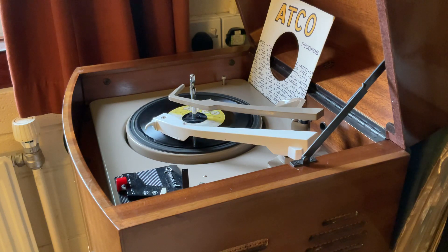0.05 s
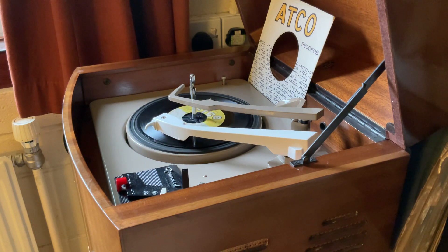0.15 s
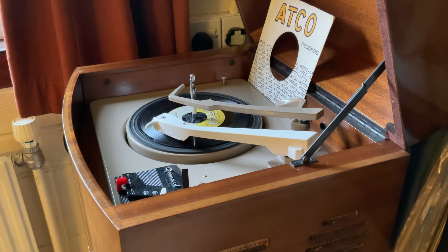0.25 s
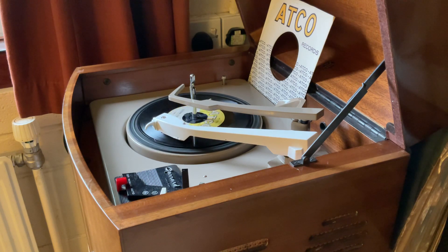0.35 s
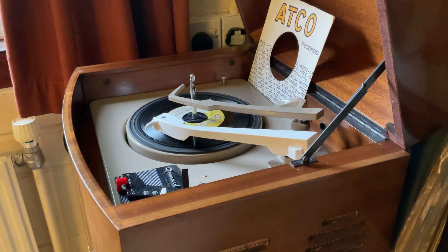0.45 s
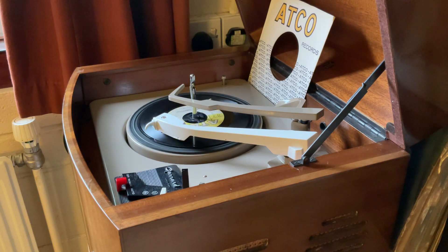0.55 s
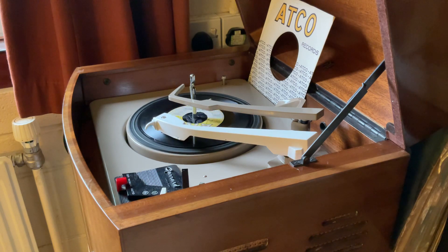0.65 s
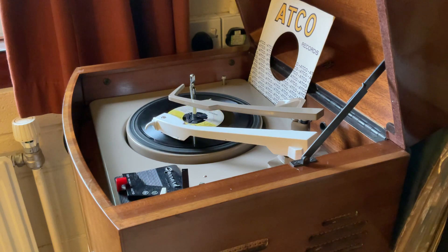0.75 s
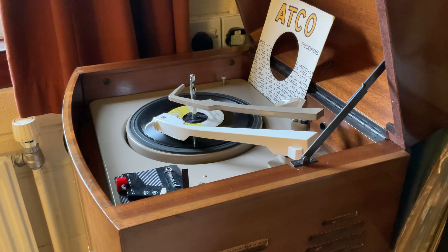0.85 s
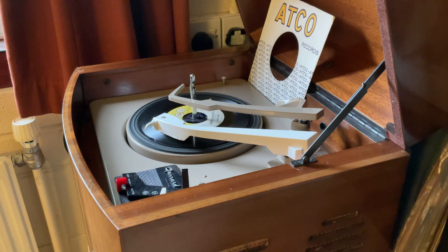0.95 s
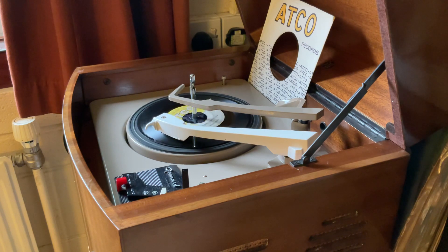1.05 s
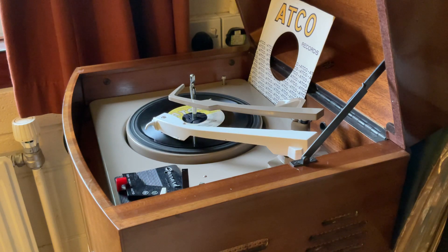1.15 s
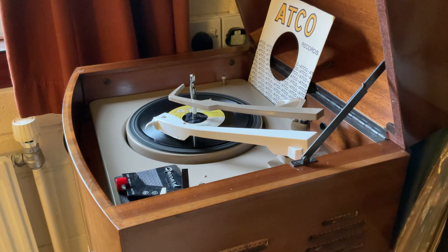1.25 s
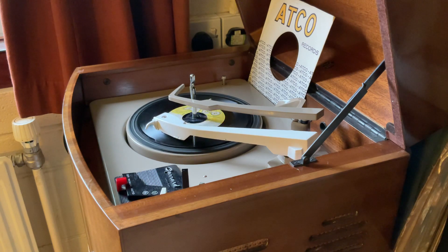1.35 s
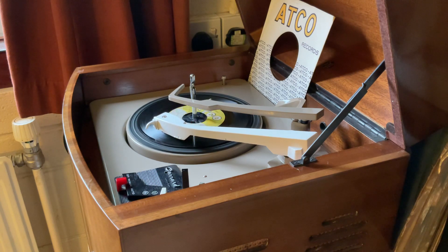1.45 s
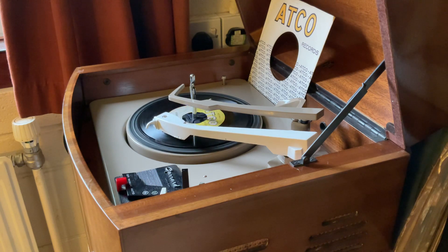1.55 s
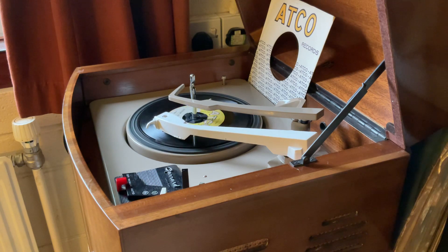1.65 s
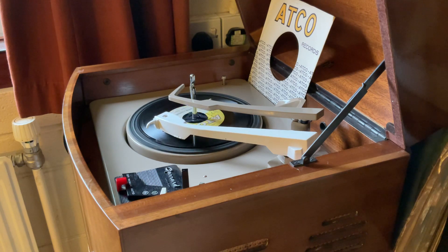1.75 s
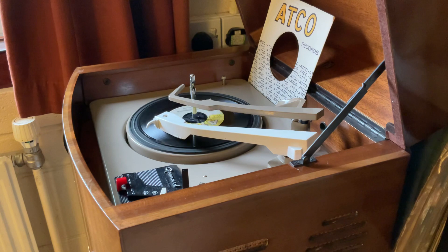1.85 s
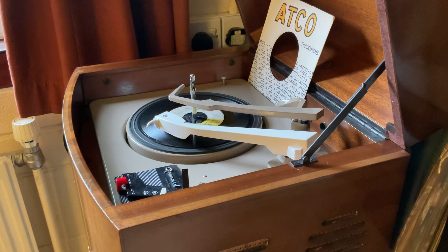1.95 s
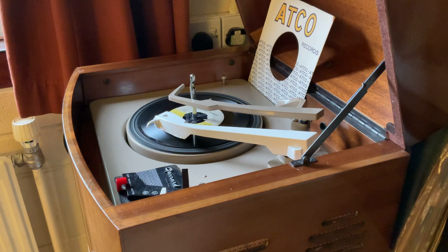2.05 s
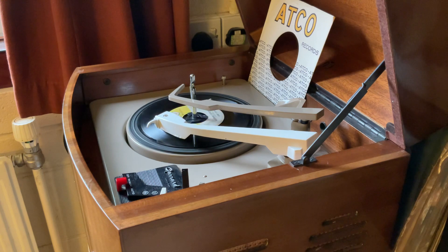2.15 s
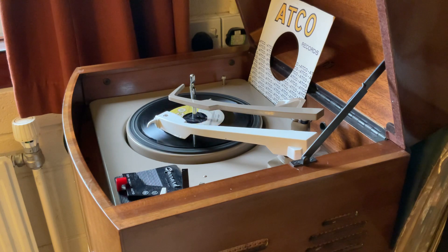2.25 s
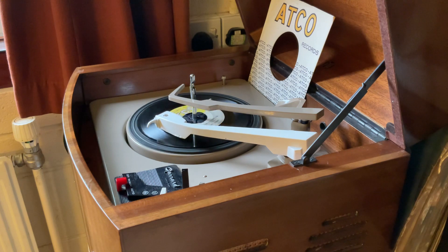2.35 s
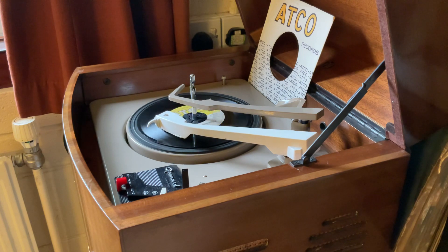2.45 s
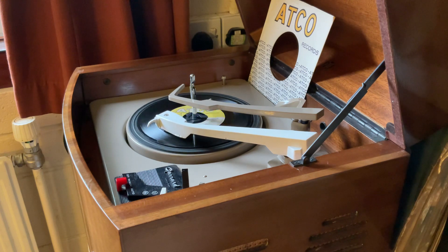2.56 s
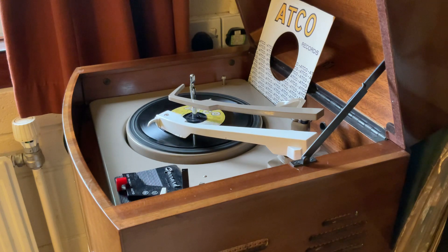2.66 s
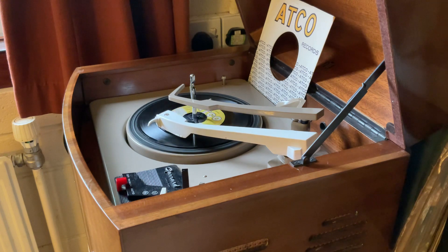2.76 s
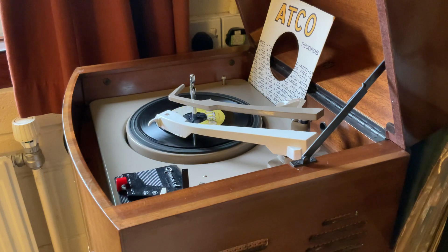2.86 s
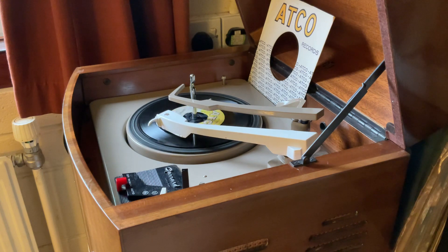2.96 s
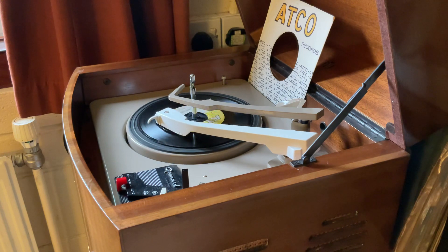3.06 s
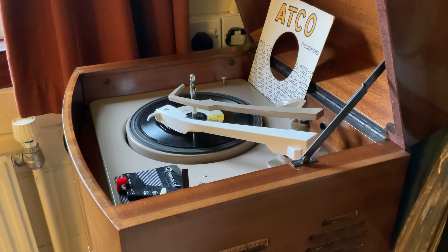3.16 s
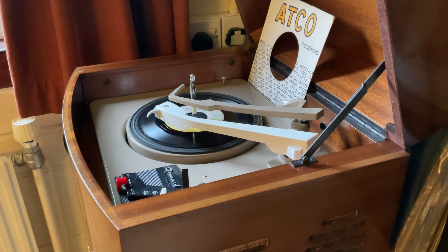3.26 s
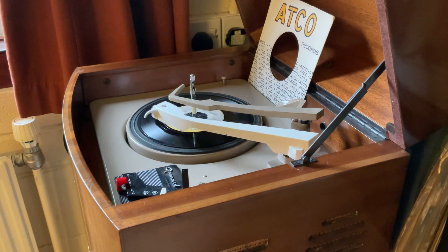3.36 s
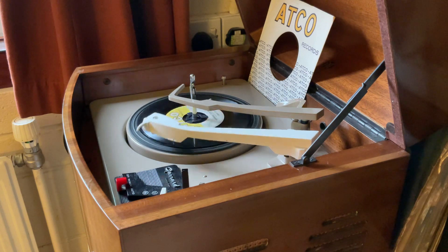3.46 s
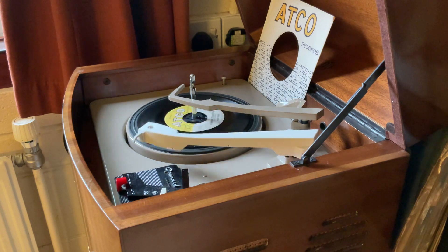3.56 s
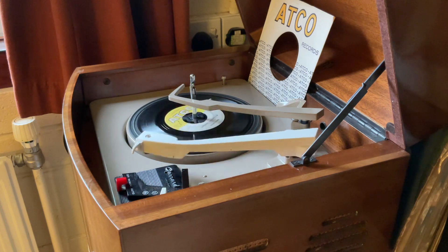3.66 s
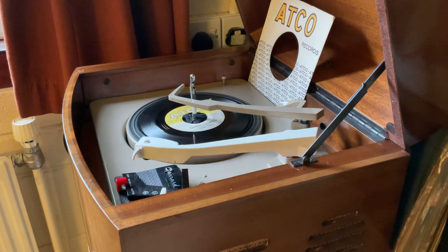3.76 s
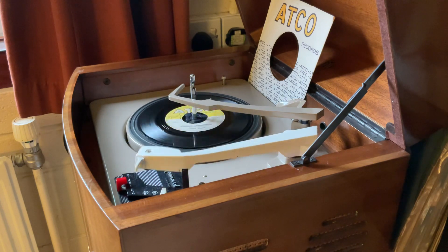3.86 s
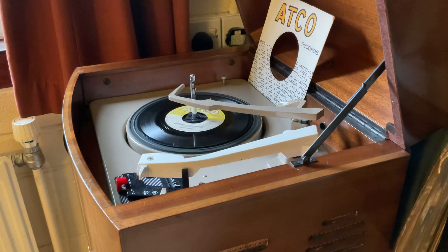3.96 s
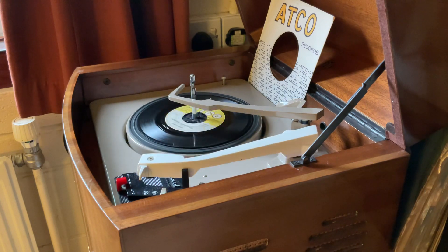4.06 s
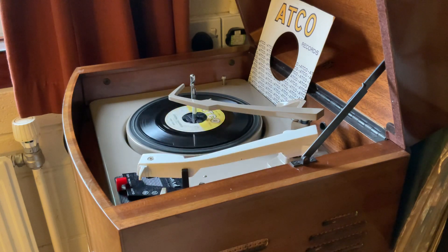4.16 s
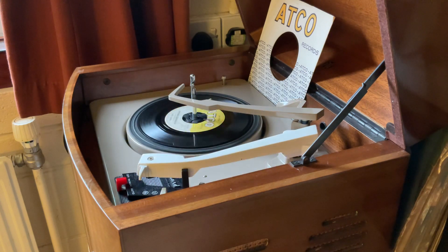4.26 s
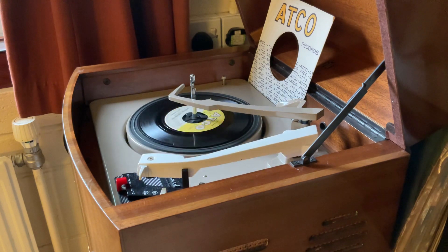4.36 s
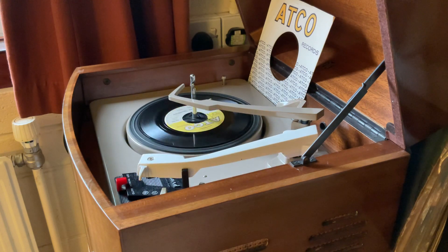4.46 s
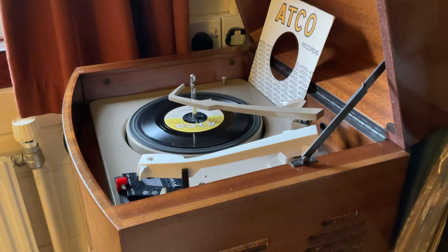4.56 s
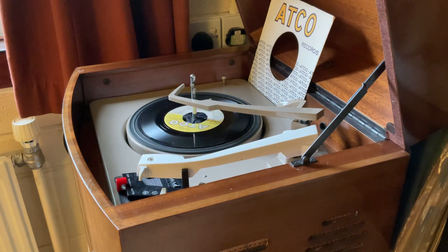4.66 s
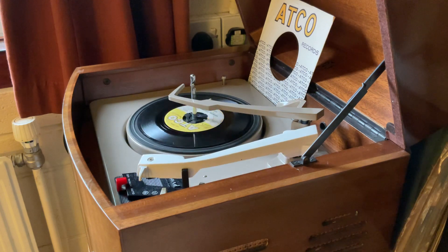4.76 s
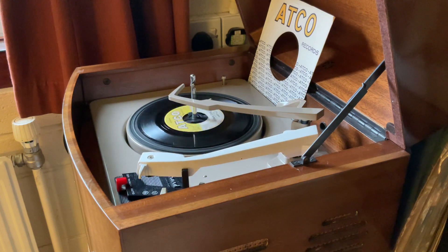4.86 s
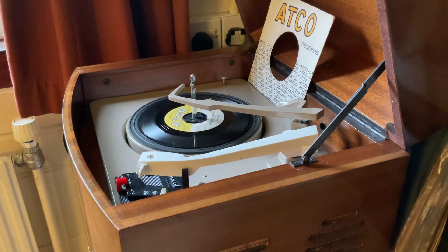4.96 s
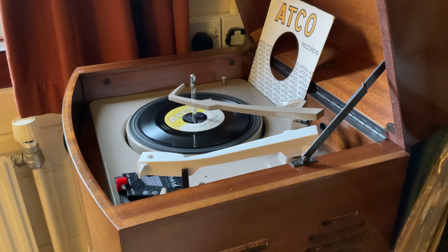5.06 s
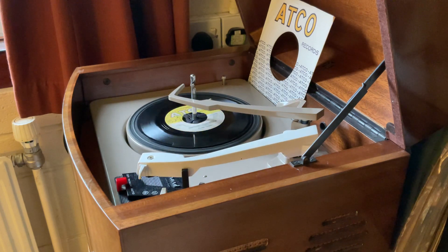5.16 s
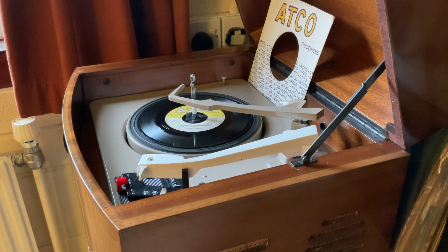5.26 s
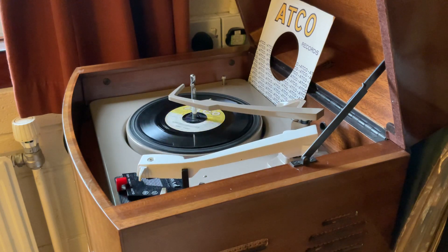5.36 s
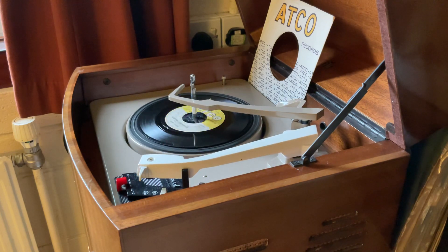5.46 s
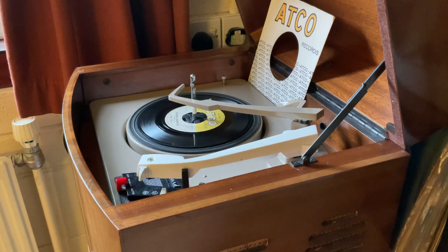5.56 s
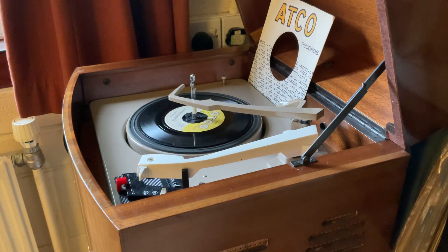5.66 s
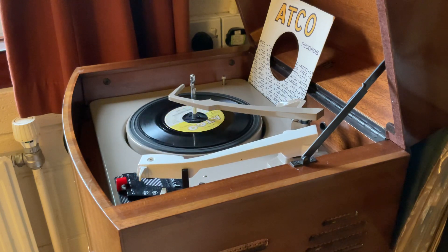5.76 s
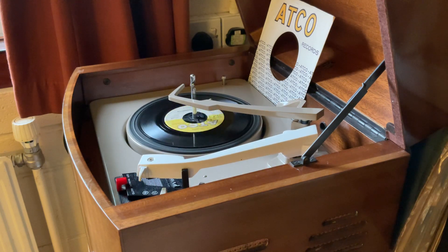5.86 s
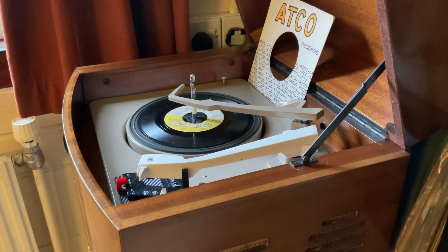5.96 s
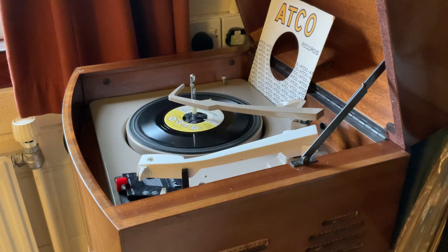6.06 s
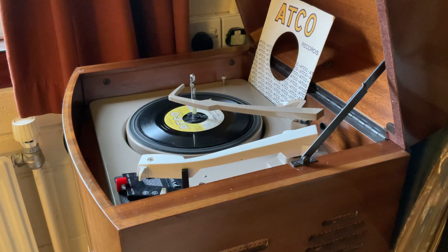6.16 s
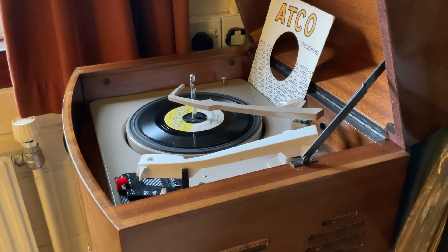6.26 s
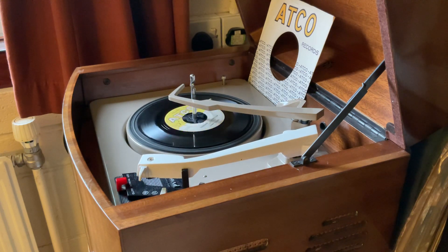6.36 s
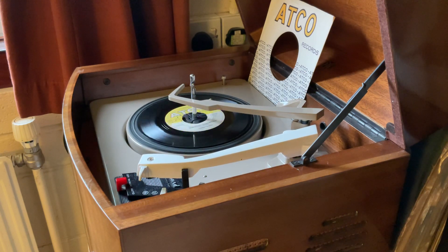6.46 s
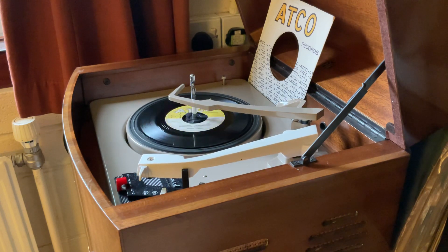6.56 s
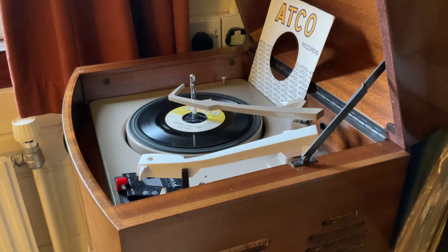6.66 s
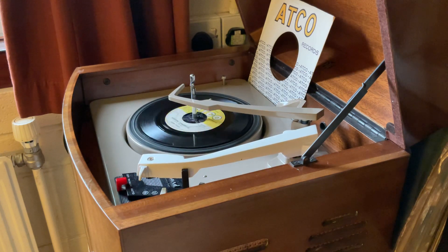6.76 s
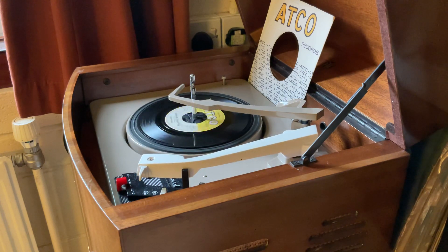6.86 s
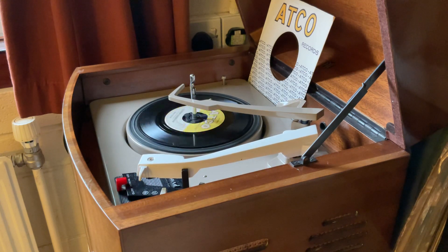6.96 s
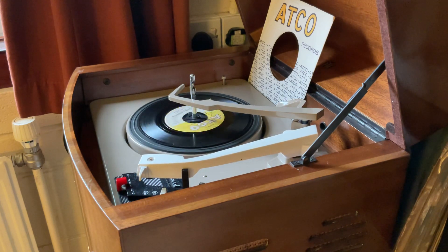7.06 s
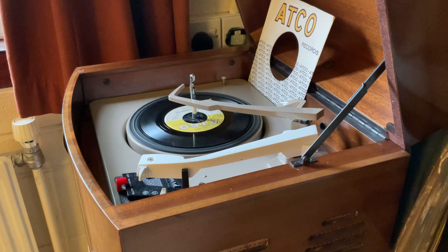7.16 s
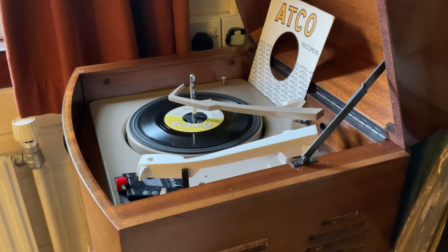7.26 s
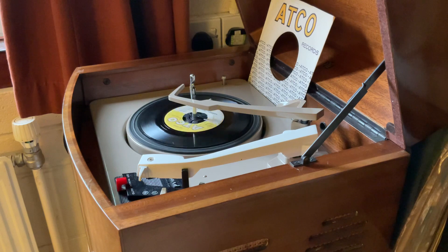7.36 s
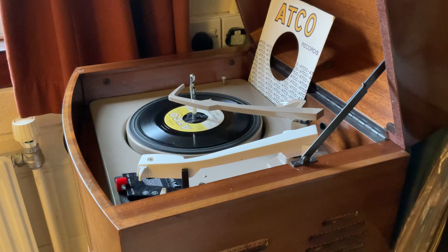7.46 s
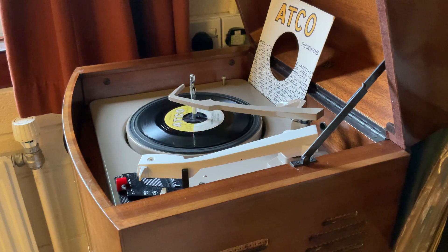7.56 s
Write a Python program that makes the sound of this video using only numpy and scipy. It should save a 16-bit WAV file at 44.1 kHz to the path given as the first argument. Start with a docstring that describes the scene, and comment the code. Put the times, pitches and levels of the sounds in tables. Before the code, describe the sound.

Soft dust pops and a thin needle hiss sit over the low hum of a record changer, heard up close indoors. The mechanism engages with metallic clicks and a low rubbing rumble, then the wooden cabinet gives a deep thump, the loudest sound. Three separate sharp clacks follow as the pickup arm returns, lands and latches, some leaving a thin ping. The drive keeps running with light, quick ticks and a few small clicks.

```python
"""Stylus hiss and dust ticks over a motor hum, then the clicks and deep clunk of a record changer.
Close by, in a small room, the needle rides the run-out groove until a pawl trips and the arm lifts.
A cam rumbles and rubs; steel levers click as the arm swings back and drops on its rest.
Each contact rings a steel part and knocks the wooden cabinet; three leave a thin metal ping.
The drive runs on with a faint regular tick, a flaw on its wheel scuffing the chassis."""
import sys
import numpy as np
from scipy import signal
from scipy.fft import rfft, irfft, next_fast_len
from scipy.io import wavfile
from scipy.ndimage import uniform_filter1d, map_coordinates

SR = 44100
rng = np.random.default_rng(int(sys.argv[2]) if len(sys.argv) > 2 else 0)


def int16_out(signal):
    """Quantize to a 16-bit WAV file."""
    q = np.round(np.clip(np.atleast_2d(signal).T, -1, 1) * 32767)
    wavfile.write(sys.argv[1], SR, q.astype(np.int16))


N = 335160
TIME_S, HIT_TIME_S = np.arange(N) / SR, np.arange(2 ** 14) / SR
TRIP_S, LIFT_S, RELEASE_S = 2.372, 2.86, 5.04

# Contacts of each steel part. Each row: start in seconds, then mid ring, cabinet knock, low ring, # high ring
# and sizzle in relative dB, then contact length in seconds. # The last cam-catch row is a soft tick that falls
# with a turn of the drive wheel.
PAWL_HITS = [(2.3717, -42.5, -55, -46.5, -41, -51, 0.035), (2.3797, -35, -23, -45.5, -32, -34.5, 0.0072),
             (7.0237, -53, -48, -58, -64, -63, 0.023)]
CATCH_HITS = [(2.4476, -31, -34.5, -29.5, -40.5, -47, 0.0087), (2.726, -47.5, -56, -41, -62.5, -87, 0.016),
              (2.748, -98, -39.5, -49, -92, -92, 0.09), (5.5435, -40.5, -40.5, -38.5, -57, -74, 0.016),
              (5.668, -60.5, -44, -57, -87, -102, 0.047), (6.6165, -45, -47, -50.5, -62.5, -63, 0.0093),
              (6.624, -54.5, -48.5, -52, -72, -75, 0.013), (6.981, -69.5, -53.5, -62, -100, -93, .011)]
LEVER_HITS = [(2.8462, -45, -37, -55.5, -56.5, -78, 0.0076), (3.3303, -51, -47, -50.5, -89, -84, 0.013),
              (3.4066, -46.5, -37.5, -43.5, -75, -67.5, 0.035), (3.4835, -18, -26, -29.5, -32, -43, 0.0089),
              (3.5025, -39, -37, -31.5, -56, -68, 0.0063), (3.6726, -46.5, -45.5, -59.5, -69, -82, 0.0091),
              (3.7035, -55, -44.5, -57.5, -74, -74.5, 0.015), (5.5097, -54, -67, -61, -65, -70.5, 0.023)]
ARM_HITS = [(3.015, -40, -37.5, -40, -55, -66, 0.021), (3.0414, -48, -38.5, -47, -59, -84, 0.026),
            (3.079, -37, -37.5, -42, -47, -57.5, 0.02), (3.0838, -44.5, -37, -36.5, -50.5, -49, 0.015),
            (3.9627, -30.5, -24.5, -41.5, -41.5, -49.5, 0.011), (4.002, -47.5, -47, -61, -56, -67, 0.017),
            (4.0316, -27, -35, -38, -55, -38.5, 0.016), (4.0379, -22, -31, -30.5, -30, -42, 0.012),
            (4.0441, -31, -39, -30, -43, -43, 0.021)]
LATCH_HITS = [(4.6947, -54, -43, -61, -73, -76, 0.018), (4.7626, -57.5, -50, -55.5, -89, -95, 0.021),
              (5.0429, -23.5, -38.5, -27, -35, -45.5, 0.019), (5.305, -60.5, -55, -81.5, -87.5, -103, 0.02)]
# Resonances of those parts, the chassis plate and the hollow arm.
# Each row: centre in Hz, width in Hz, level in relative dB.
PAWL_RING = [(1220, 83, 16), (2980, 200, -6), (4400, 49, -2), (5620, 70, 2), (6300, 140, -7.5),
             (7040, 81.6, 2.5), (8120, 54.8, 3), (9310, 78, 4.5), (10090, 80, 7.5), (10640, 90, 0.5),
             (13940, 500, -15)]
CATCH_RING = [(778, 90, -19.5), (1110, 150, -1.5), (1241, 85, 5.5), (1332, 72, 8), (1704, 90, 5.5),
              (2170, 200, -8), (3000, 160, -3.5), (3720, 320, -12), (4400, 120, -10.5), (5580, 160, -13.5),
              (6840, 140, -9), (8080, 160, -9), (9770, 360, -12)]
LEVER_RING = [(665.2, 33, -6), (1362, 350, -10), (1719, 80, -4), (2166, 350, -9), (3140, 79, -9.5),
              (3310, 260, -7.5), (5300, 80, -3.5), (5903, 140, -11.5), (6384, 150, 1), (8340, 130, -14.5),
              (9000, 100, -6)]
ARM_RING = [(696, 320, -4), (1094, 59, -5.5), (1346, 73, -4.5), (1736, 67, 4.5), (2010, 70, 2),
            (2360, 330, -8.5), (3040, 310, 0.5), (3610, 110, 2.5), (4000, 80, -12.5), (5440, 260, -2),
            (5950, 98, -6), (6300, 140, -6), (8600, 96, -5.5), (10570, 570, -6)]
LATCH_RING = [(439, 10, 5), (1120, 35, -7.5), (1240, 33, 0.5), (1430, 40, 1.5), (1660, 110, 0),
              (2320, 93, -3.5), (2827, 85, -0.5), (3690, 30, -3.5), (4050, 50, -14), (4360, 70, -11.5),
              (5170, 82, -19), (6970, 110, -10.5), (7950, 61, -4.5)]
PLATE_RING = [(595, 90, 10.5), (801, 110, 13), (1260, 110, 8), (1489, 150, 0.5)]
HOLLOW_ARM_RING = [(450, 380, 0), (807, 201, 1.5), (1670, 800, 0.5)]
# Blows on the sprung deck. Each row: start in seconds, level in dB, hardness in Hz, low cut in Hz.
DECK_BLOWS = [(2.379, -29, 350, 140), (2.393, -28.5, 290, 141), (2.447, -27, 300, 147),
              (2.466, -25.5, 300.5, 141.4), (2.8906, -6.5, 580, 30.3), (3.966, -23.5, 800, 110),
              (4.017, -32, 402, 139), (4.697, -32.5, 1115, 160), (5.052, -28.5, 1005, 330),
              (6.621, -44.5, 1500, 419), (7.033, -49, 1500, 483)]
# Deck and cabinet modes. Each row: frequency in Hz, level in relative dB, t60 in seconds.
CABINET_MODES = [(115, -7, 0.2), (179.5, -17, 0.087), (202.9, -11, 0.25), (228, 1, 0.06),
                 (284.4, -4.5, 0.058), (305, -25, 0.28), (383.7, -20.5, 0.066), (432, -18, 0.085),
                 (478, -23.5, 0.14), (575, -28.5, 0.07), (683, -33.5, 0.12), (801, -14, 0.022),
                 (925, -33, 0.13), (1050, -29.5, 0.096), (1400, -25, 0.0591), (1972, -6.5, 0.0078)]
# Three metal pings, one squeak. Each row: start in seconds, frequency in Hz, level in dB, t60 in seconds.
THIN_TONES = [(2.447, 1402, -45, 0.49), (4.039, 1453, -46.5, 0.47), (5.043, 1360, -52.5, 0.56),
              (5.955, 2974, -67.5, .1)]
# Cam strokes. Each row: start and slip in seconds, rumble and rub in relative dB.
CAM_STROKES = [(2.452, 2.963, -45, -60.5), (3.312, 3.499, -47.5, -59), (3.686, 3.943, -55, -74)]
# Drive wheel speed as its load changes. Each row: start in seconds, period in seconds.
WHEEL_PERIODS = [(2.645, .06935), (5.417, .0624), (6.041, .0686), (6.384, .0657)]
# Force of the wheel's scuff. Each row: time in seconds, level in relative dB.
SCUFF_FORCE = [(2.65, 7.5), (3.2, 2), (3.85, 4.5), (4.3, -1), (4.95, -2), (5.45, 6.5), (5.72, -3), (6.0, 2),
               (6.8, -5), (7.05, 1.5), (7.6, -0.5)]
# Worn groove patches. Each row: time into the turn and half-width in seconds, hiss boost in dB.
WORN_PATCHES = [(0.15, 0.03, 3), (0.33, 0.087, 10.5), (0.6, 0.043, 7), (1.12, 0.042, 8)]
# Dust specks. Each row: start in seconds, tick and pop in relative dB, tick t60 in seconds.
DUST_SPECKS = [(0.136, -69, -60.5, 0.02), (0.268, -54.5, -49, .022), (0.686, -64, -60, 0.039),
               (0.994, -68, -58, .02), (1.355, -68, -60, 0.033), (1.65, -61.5, -60, 0.12),
               (1.828, -61, -60, 0.05), (2.2902, -56.5, -53.5, 0.017)]
# Noise spectra. Each row: frequency in Hz, level in relative dB.
CAM_RUMBLE_EQ = [(70, -17.5), (140, 0.5), (230, 1), (320, -7.5), (480, -16.5), (800, -20.5), (1500, -55.5)]
CAM_RUB_EQ = [(400, -19), (700, -5.5), (1300, 6), (1850, 0.5), (2400, -10.5), (5000, -23), (7000, -27.5),
              (12000, -46)]
GROOVE_EQ = [(2700, -19.5), (3200, -18.5), (3480, 4), (3850, -14.5), (4500, -7.5), (5300, -31.5),
             (5880, 3.5), (6400, -11), (9000, -9.5), (11000, -1.5), (12300, 7.5), (14300, 7),
             (15800, -10.5)]
RASP_EQ = [(2000, -34), (4000, 3), (8500, -9.5), (15000, 0)]
DUST_EQ = [(300, 1.5), (1700, 1.5), (2700, -15), (3500, 0.5), (5000, -13.5), (7500, -11), (13000, -3.5),
           (16000, -3)]
ROOM_NOISE_EQ = [(25, -3), (44, -10.5), (56, 6), (80, -4.5), (140, 2), (215, 6), (290, -2.5), (420, -6.5),
                 (900, -14.5), (1600, -19), (2600, -40), (6000, -41), (13300, -48.5), (14500, -60.5)]
# Motor hum. Each row: multiple of the magnetic pull rate, rms level in dB.
HUM_HARMONICS = [(1, -53), (2, -53), (3, -69), (4, -75.5)]
# Room decay. Each row: frequency in Hz, t60 in seconds.
ROOM_T60 = [(150, 0.56), (400, 0.087), (1200, 0.27), (2800, 0.19), (7000, 0.17), (14000, 0.14)]
# Likeness of the two channels. Each row: frequency in Hz, correlation.
STEREO_LIKENESS = [(100, 1), (290, .85), (640, 0), (3000, 0.13), (7000, 0.97)]
# Phase and level difference between left and right, by frequency.
# Each row: frequency in Hz, then left lead in radians or left excess in dB.
LEFT_LEAD_RAD = [(100, 0.08), (200, 0.38), (400, 0.46), (690, 1.4), (1120, 1), (1460, 0.8), (2150, -2),
                 (3100, -2.5), (4130, -6.5), (16000, -5.5)]
LEFT_EXCESS_DB = [(100, -0.34), (200, 3), (380, 0.5), (700, 7.5), (1300, 1.5), (2400, -2), (4400, -2),
                  (8000, -3), (15000, 1.5)]
# Low, mid, high and sizzle bands of a click. Each row: lower and upper edge in Hz.
CLICK_BANDS = [(900, 2200), (2500, 7000), (7000, 11000), (11000, 15500)]


def clunks(wet_db=-12, pad_hz=2500):
    """Heavy blows on the deck make the cabinet boom: the lift dropping its weight, and the low knock under
    several clicks; a rubber pad dulls the edge."""
    out = np.zeros((2, N))
    for start_s, db, hardness_hz, lowest_hz in DECK_BLOWS:
        drive = lambda hz: causal(low_cut(hz, lowest_hz, 3)) * high_cut(hz, pad_hz, 6)
        boom = filtered(cabinet(hardness_hz), drive)
        add(out, start_s, in_room(amp(db) * boom / abs(boom).max(), wet_db, spread=0.97))
    return out


def cabinet(hardness_hz, travel_s=0.00601, bend_hz=250):
    """The wooden box rings after a push; bending waves bring the lows later than the highs."""
    t = HIT_TIME_S
    ring = sum(amp(db - 60 * t / t60) * np.sin(2 * np.pi * hz * t) for hz, db, t60 in CABINET_MODES)
    push = lambda hz: causal(high_cut(hz, hardness_hz, 1) * low_cut(hz, 100, 3))
    dispersion = lambda hz: np.exp(-4j * np.pi * travel_s * np.sqrt(bend_hz * hz))
    return filtered(ring, lambda hz: push(hz) * dispersion(hz))


def clicks(hits, modes, ring_db, knock_db, crack_db, wet_db, damping_hz, attack_s, lowest_hz):
    """Each contact rings a steel part and, through the deck, knocks the cabinet."""
    out = np.zeros((2, N))
    hz = np.fft.rfftfreq(len(HIT_TIME_S), 1 / SR)
    # a light part cannot drive the lowest notes of the box
    box = rfft(cabinet(hardness_hz=2487)) * causal(low_cut(hz, lowest_hz, 3) * high_cut(hz, 900, 2))
    band_limit = low_cut(hz, 550, 2) * high_cut(hz, 14500, 12)
    for start_s, mid_db, wood_db, low_db, high_db, sizzle_db, length_s in hits:
        # each contact favours other modes; the joints damp them
        struck = [(centre, width + damping_hz, db + 1.2 * rng.standard_normal())
                  for centre, width, db in modes]
        steel = causal(resonances(struck, hz) + amp(crack_db))
        ring = rfft(burst(length_s * 2, attack_s)) * steel
        # place and force of the strike set each band's level
        band_eq = []
        for (lo, hi), db in zip(CLICK_BANDS, [low_db, mid_db - 4.5, high_db, sizzle_db]):
            band = irfft(ring * (hz > lo) * (hz < hi))
            band_eq.append((np.sqrt(lo * hi), db - 20 * np.log10(peak_rms(band))))
        click = amp(ring_db) * irfft(ring * causal(amp(along(band_eq, hz)) * band_limit))
        knock = irfft(box * rfft(burst(0.15, attack_s=0.00025)))
        coupling = 1 / (1 + amp(2 * (-48 - wood_db)))  # gentle contacts hardly move the deck
        contact = click + coupling * at_level(knock, wood_db + knock_db)
        add(out, start_s, in_room(contact, wet_db, spread=0.59))
    return out


def pings_and_squeak():
    """Thin metal pings after three clicks, and one faint squeak."""
    out, t = np.zeros(N), HIT_TIME_S
    for start_s, hz, db, t60 in THIN_TONES:
        add(out, start_s, amp(db - 60 * t / t60) * np.sin(2 * np.pi * hz * t))
    return out


def cam(idle_db=-59, rumble_build_db=17, rub_build_db=6.5, slack_db_per_s=108):
    """The engaged cam rumbles; each stroke loads a spring, followers rubbing, until it slips."""
    t = TIME_S
    rumble, rub = amp(idle_db) * gate(TRIP_S, RELEASE_S), np.zeros(N)
    for start_s, slip_s, rumble_db, rub_db in CAM_STROKES:
        to_go = np.clip((slip_s - t) / (slip_s - start_s), 0, 1)
        stroke = gate(start_s, t[-1]) * amp(-slack_db_per_s * np.maximum(t - slip_s, 0))
        rumble += stroke * amp(rumble_db + 2 - rumble_build_db * to_go)
        rub += stroke * amp(rub_db - 1 - rub_build_db * to_go)
    return (rumble * amp(wobble(30)) * stereo_noise(CAM_RUMBLE_EQ)
            + rub * amp(4 * wobble(34)) * stereo_noise(CAM_RUB_EQ))


def drive_wheel(tap_db=-72.5, plate_db=-63.5, scatter_db=2, slip_s=0.003, tap_hz=1802, tap_width_hz=190):
    """A flaw scuffs the chassis once a turn, unevenly as the wheel slips; the plate answers."""
    out = np.zeros((2, N))
    starts_s, periods_s = np.transpose(WHEEL_PERIODS)
    turns_per_s = (TIME_S > starts_s[0]) / periods_s[np.searchsorted(starts_s, TIME_S) - 1]
    turns = np.cumsum(turns_per_s) / SR
    scuffs_s = TIME_S[np.flatnonzero(np.diff(np.ceil(turns)))]
    tap_response = lambda hz: causal(resonances([(tap_hz, tap_width_hz, 0)], hz) ** 2)
    plate_response = lambda hz: causal(resonances(PLATE_RING, hz) * high_cut(hz, 2100, 3))
    for due_s, (late, strength) in zip(scuffs_s, rng.standard_normal((len(scuffs_s), 2))):
        start_s = due_s + slip_s * np.tanh(late)
        force_db = scatter_db * strength + np.interp(due_s, *np.transpose(SCUFF_FORCE))
        tap = at_level(filtered(burst(0.04, attack_s=0.00173), tap_response), force_db + tap_db)
        plate = at_level(filtered(burst(0.036, attack_s=0.0021), plate_response), force_db + plate_db)
        add(out, start_s, in_room(tap, wet_db=-5, spread=0.88))
        add(out, start_s + 0.002036, in_room(plate, wet_db=-0.5, spread=0.63))
    return out


def stylus(hiss_db=-85, pushed_db=-71.5, turn_s=1.333):
    """The needle grates over worn patches each turn, then harder as the trip lever pushes the arm."""
    wear_db = np.zeros(N)
    for centre_s, width_s, db in WORN_PATCHES:
        offset_s = (TIME_S - centre_s + turn_s / 2) % turn_s - turn_s / 2
        wear_db += db * np.exp(-0.5 * (offset_s / width_s) ** 2)
    pressure = amp(hiss_db + wear_db) * gate(0, TRIP_S) + amp(pushed_db) * gate(TRIP_S, LIFT_S)
    # tiny uneven slips ring the needle and its holder
    slips = rng.standard_normal(N) * amp(4 * wobble(1500) + 1.2 * wobble(120))
    grit = filtered(slips, lambda hz: causal(amp(along(GROOVE_EQ, hz))))
    return pressure * amp(2.8 * wobble(14)) * patchy(np.array([grit, grit]), depth_db=4)


def trip_lever(level_db=-69):
    """The trip lever rasps along the arm from the first cam stroke to the lift."""
    envelope = amp(level_db + 2.6 * wobble(45.06)) * gate(CAM_STROKES[0][0], LIFT_S)
    return envelope * patchy(stereo_noise(RASP_EQ), depth_db=7.5)


def dust(gain_db=-5.5):
    """Each speck ticks under the needle and pops in the hollow arm."""
    out = np.zeros((2, N))
    tick_response = lambda hz: causal(amp(along(DUST_EQ, hz)))
    arm_response = lambda hz: causal(resonances(HOLLOW_ARM_RING, hz) ** 2)
    for start_s, tick_db, pop_db, t60_s in DUST_SPECKS:
        tick = at_level(filtered(burst(t60_s, attack_s=t60_s / 10), tick_response), tick_db)
        pop = at_level(filtered(burst(0.0082, attack_s=0.0005), arm_response), pop_db)
        add(out, start_s, in_room(amp(gain_db) * (tick + pop), wet_db=-4.5, spread=1))
    return out


def motor(pull_hz=99.99, whine_hz=1061, whine_db=-80):
    """Mains hum from the motor's iron, with a faint whine."""
    hum = sum(amp(db + 1.3 * wobble(13)) * np.sin(2 * np.pi * (k * pull_hz * TIME_S + rng.random()))
              for k, db in HUM_HARMONICS)
    whine = amp(1.5 * wobble(5)) * np.sin(2 * np.pi * whine_hz * TIME_S + 0.5 * wobble(4))
    return np.sqrt(2) * (hum + amp(whine_db) * whine)


def in_room(x, wet_db, spread, gap_s=0.0032):
    """A blow plus its short room tail, thin in the bass and slightly different at each ear."""
    hz, t, spectra = signal.stft(rng.standard_normal((2, len(x))), SR, nperseg=256)
    decay = amp(-60 * t / along(ROOM_T60, hz)[:, None])
    mid, side = signal.istft(spectra * decay, SR, nperseg=256)[1][:, :len(x)]
    side = filtered(side, lambda f: spread * np.sqrt(1 - np.clip(along(STEREO_LIKENESS, f), 0, 1)))
    tail = np.array([mid + side, mid - side]) * np.clip(HIT_TIME_S / gap_s - 1, 0, 1)
    tail = signal.sosfilt(signal.butter(2, 330, "highpass", fs=SR, output="sos"), tail)
    return x + amp(wet_db) * signal.fftconvolve(x[None], tail / np.linalg.norm(mid), axes=1)[:, :len(x)]


def stereo_noise(eq):
    """Coloured stereo noise, rms 1."""
    def mid_side(hz):
        angle = np.arccos(np.clip(along(STEREO_LIKENESS, hz), -1, 1)) / 2
        return amp(along(eq, hz)) * [np.cos(angle), np.sin(angle)]
    mid, side = filtered(rng.standard_normal((2, N)), mid_side)
    return unit(np.array([mid + side, mid - side]))


def patchy(x, depth_db):
    """x with a randomly shifting colour, rms 1."""
    spectra = signal.stft(x, nperseg=512)[2]
    field = uniform_filter1d(rng.standard_normal(spectra.shape[1:]), size=5, axis=0)
    field = uniform_filter1d(field, size=12, axis=1)
    return unit(signal.istft(spectra * amp(depth_db * unit(field)), nperseg=512)[1][:, :N])


def burst(t60_s, attack_s):
    """Contact chatter: noise that swells and dies."""
    t = HIT_TIME_S
    return rng.standard_normal(len(t)) * amp(-60 * t / t60_s) * (1 - np.exp(-t / attack_s))


def wobble(knots_per_s):
    """Smooth random curve."""
    knots = rng.standard_normal(int(N * knots_per_s / SR) + 4)
    return map_coordinates(knots, [TIME_S * knots_per_s])


def gate(start_s, end_s, fade_s=0.02):
    """Gain 1 from start to end, fading outside."""
    return np.clip(np.minimum(TIME_S - start_s, end_s - TIME_S) / fade_s + 1, 0, 1)


def resonances(modes, hz):
    """Gain of resonances summed in power."""
    return np.sqrt(sum(amp(db) ** 2 * (hz * width) ** 2 / ((centre**2 - hz**2) ** 2 + (hz * width) ** 2)
                       for centre, width, db in modes))


def low_cut(hz, corner_hz, order):
    """High-pass gain."""
    return 1 / np.hypot(1, (corner_hz / (hz + 1)) ** order)


def high_cut(hz, corner_hz, order):
    """Low-pass gain."""
    return 1 / np.hypot(1, (hz / corner_hz) ** order)


def causal(gain):
    """Minimum-phase response with this gain."""
    cepstrum = irfft(np.log(np.maximum(gain, 1e-6)))
    cepstrum[1:len(cepstrum) // 2] *= 2
    cepstrum[len(cepstrum) // 2 + 1:] = 0
    return np.exp(rfft(cepstrum))


def filtered(x, response):
    """x through a complex response of Hz."""
    n = x.shape[-1]
    padded = next_fast_len(n + 8192)
    return irfft(rfft(x, padded) * response(np.fft.rfftfreq(padded, 1 / SR)), padded)[..., :n]


def along(points, hz):
    """Interpolate (Hz, value) points on a log axis."""
    points_hz, values = np.transpose(points)
    return np.interp(np.log(hz + 1), np.log(points_hz + 1), values)


def add(track, start_s, sound):
    """Mix a sound into a track."""
    part = track[..., max(round(start_s * SR), 0):][..., :sound.shape[-1]]
    part += sound[..., :part.shape[-1]]


def peak_rms(x):
    """Rms of the loudest 6 ms."""
    return np.sqrt(uniform_filter1d(x ** 2, size=256).max() + 1e-20)


def at_level(x, db):
    """Scale the loudest 6 ms to this level."""
    return amp(db) * x / peak_rms(x)


def unit(x):
    """Scale to rms 1."""
    return x / np.sqrt(np.mean(x ** 2) + 1e-20)


def amp(db):
    """dB to gain."""
    return 10 ** (np.asarray(db) / 20)


def scene():
    """The machine, slightly left, over low room noise."""
    pawl = clicks(PAWL_HITS, PAWL_RING, ring_db=-2.5, knock_db=-14, crack_db=-23,
                  wet_db=-4.5, damping_hz=59.5, attack_s=0.0019, lowest_hz=197.7)
    cam_catch = clicks(CATCH_HITS, CATCH_RING, ring_db=1, knock_db=-2.5, crack_db=-30,
                       wet_db=-6.5, damping_hz=6.4, attack_s=0.0092, lowest_hz=200.1)
    lever = clicks(LEVER_HITS, LEVER_RING, ring_db=0, knock_db=-4.5, crack_db=-20.5,
                   wet_db=-5, damping_hz=16, attack_s=0.014, lowest_hz=383)
    arm = clicks(ARM_HITS, ARM_RING, ring_db=-1.5, knock_db=-3.5, crack_db=-11.5,
                 wet_db=-6, damping_hz=12, attack_s=0.0041, lowest_hz=420)
    latch = clicks(LATCH_HITS, LATCH_RING, ring_db=-1, knock_db=4.5, crack_db=-21.5,
                   wet_db=-5, damping_hz=25, attack_s=0.0068, lowest_hz=400)
    machine = (pawl + cam_catch + lever + arm + latch + clunks() + pings_and_squeak()
               + drive_wheel() + motor() + cam() + stylus() + trip_lever() + dust())
    left = lambda hz: amp(along(LEFT_EXCESS_DB, hz) / 2) * np.exp(0.5j * along(LEFT_LEAD_RAD, hz))
    stereo = filtered(machine, lambda hz: np.array([left(hz), 1 / left(hz)]))
    return stereo + amp(-59.5) * stereo_noise(ROOM_NOISE_EQ)


def record(dry):
    """Cut the deepest bass and the highest treble."""
    bottom_hz, top_hz = 46, 15900
    top = lambda hz: np.clip((top_hz - hz) / 400 + 0.5, 0, 1)
    return filtered(dry, lambda hz: top(hz) * low_cut(hz, bottom_hz, 4))


dry = scene()
out = record(dry)
int16_out(out)
```